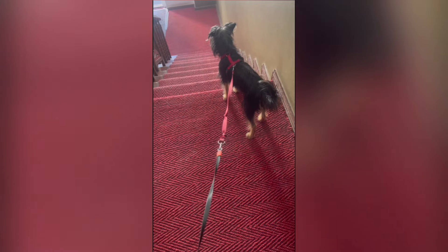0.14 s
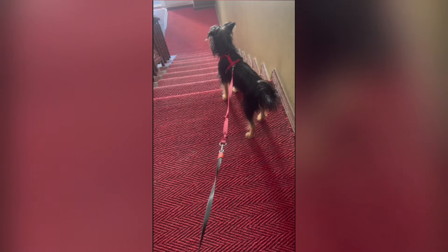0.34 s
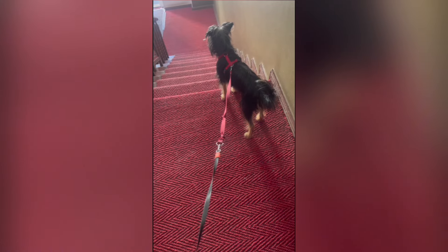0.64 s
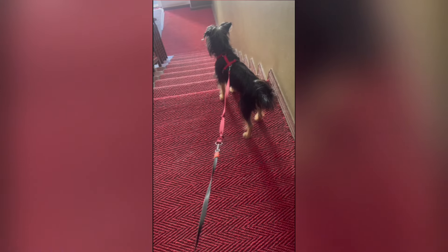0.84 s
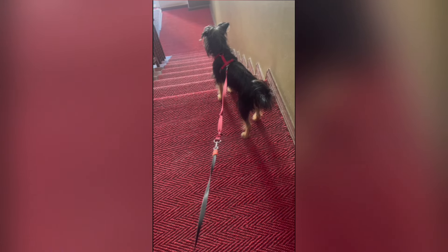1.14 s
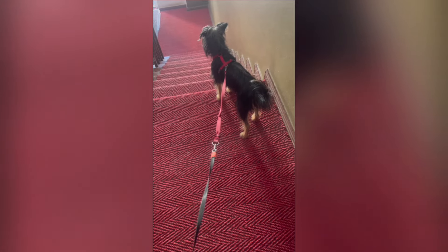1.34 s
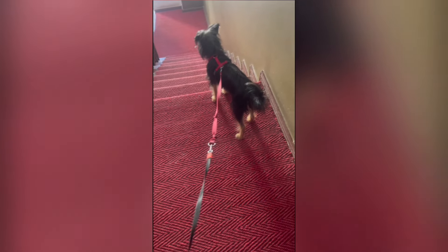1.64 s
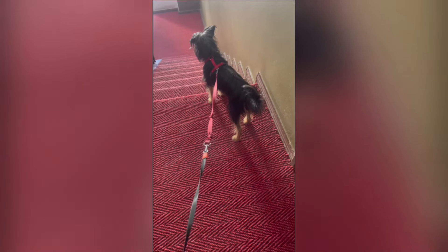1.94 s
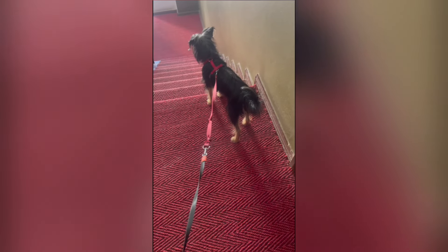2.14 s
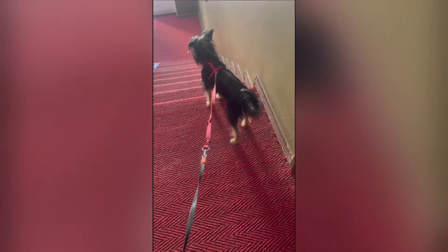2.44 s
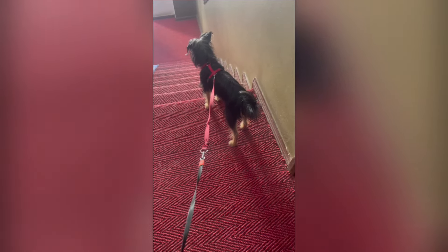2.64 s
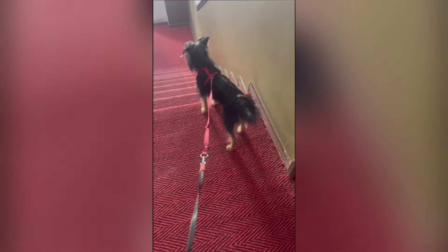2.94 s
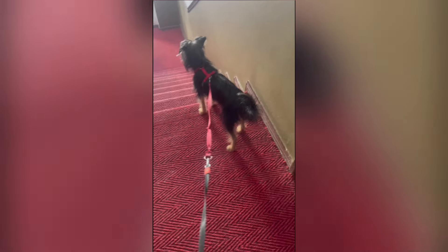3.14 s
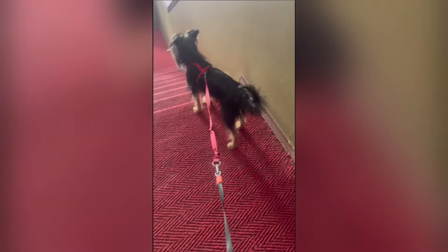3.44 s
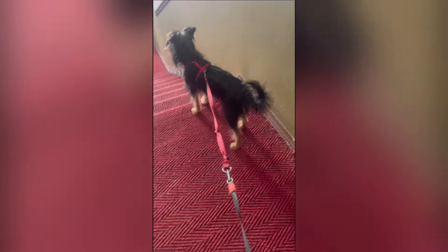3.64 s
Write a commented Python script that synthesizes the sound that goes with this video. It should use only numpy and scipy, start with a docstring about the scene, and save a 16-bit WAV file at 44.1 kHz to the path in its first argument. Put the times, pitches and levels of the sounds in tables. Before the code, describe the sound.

Dog whining indoors: high nose whistles, two yelping whines breaking into grunts, then one longer whine.

```python
"""A small dog whines at the top of a carpeted staircase, a leash's length from the microphone.
Thin whistles through the nose, made of a sine and its octave, alternate with voiced whines built from
overtones; two of the whines break downward into a grunt. Shaped noise makes the hiss in the nose and the
shuffling paws, decaying clicks the clip of the leash, and falling sine thuds its twitches.
The stairwell rings behind it all, over the low steady air of the building."""
import sys
import numpy as np
from scipy import signal
from scipy.fft import rfft, irfft, next_fast_len
from scipy.io import wavfile

SR = 44100
rng = np.random.default_rng(int(sys.argv[2]) if len(sys.argv) > 2 else 0)


def dump(signal):
    """Clip the signal to [-1, 1] and save it as 16-bit WAV at the path in sys.argv[1]."""
    limited = np.clip(np.atleast_2d(signal).T, -1, 1)
    pcm = np.round(limited * 32767).astype(np.int16)
    wavfile.write(sys.argv[1], SR, pcm)


N = 167580  # length in samples
EDGE_S = 0.004  # how fast a call starts and stops

# Still air of the building. Each row: frequency in Hz, level in dB.
HUSH = [(20, -2), (60, 2), (260, -0.5), (380, -15.5), (700, -22), (1130, -21.5), (6000, -29), (12000, -45)]
HUSH_DB, HUSH_SPREAD = -57, 0.91  # level of the middle; share of the sides

# Voiced whines, one list per call. Each row: time in seconds, pitch in Hz, level in dB, overtone boost in dB.
WHINES = [
    [(0, 440.3, -41, 1), (.04, 400.7, -35.5, -10), (.1, 366.7, -55.5, -10)],
    [(.48, 521.4, -56, -7.5), (.575, 446.4, -44, -9), (.74, 377, -54, -10.5)],
    [(.945, 370.6, -53, 6.5), (.975, 355.7, -42, -13), (1.07, 324.6, -50.5, -46)],
    [(1.61, 1370, -68.5, 11.5), (1.802, 1311, -60.5, 6), (1.812, 1291, -23.5, 0), (1.822, 1069, -14, -6.5),
     (1.826, 930, -29.5, 22.5), (1.852, 603, -33, 10.5), (1.868, 460, -54, 10.5)],
    [(2.519, 1206, -42.5, -10.5), (2.531, 1168, -19.5, 9.5), (2.556, 1146, -18, 1.5),
     (2.572, 1090, -14.5, -4), (2.588, 910.7, -35.5, 19), (2.61, 700.4, -29.5, 10.5), (2.628, 411, -23, 3),
     (2.65, 369.5, -18, -20.5), (2.7, 372, -42.5, -20.5)],
    [(3.245, 1295, -55, -25), (3.272, 1274, -31, -0.5), (3.3, 1207, -25, 5.5), (3.382, 1086, -21, 6.5),
     (3.46, 1066, -25, 9.5), (3.545, 993.7, -19, -5.5), (3.667, 875, -24, -4.5), (3.748, 870.2, -22, -11.5),
     (3.8, 886, -14.5, -15.5)],
]
# Overtone strength given by throat and muzzle. Each row: frequency in Hz, level in dB.
THROAT = [(800, -9.5), (1080, -0.5), (1500, -44.5), (1900, -34.5), (2600, -26.5), (3500, -40),
          (4200, -45.5), (4800, -30), (6000, -35.5), (7500, -34.5), (11000, -55.5)]
# Turbulence in the throat as the voice breaks. Each row: frequency in Hz, level in dB.
RASP_COLOUR = [(1100, -1), (1800, -14.5), (2750, 1), (3800, -15), (5400, -12), (14000, -34)]
# The dull air of a low voice. Each row: frequency in Hz, level in dB.
GRUFF_COLOUR = [(430, 5.5), (750, -6), (1080, 2.5), (1450, -34.5), (6000, -54.5)]
FLICKER_DB, FLICKER_HZ = 4, 22  # each overtone swells and fades by itself
VOICE_JITTER, VOICE_JITTER_HZ = 0.1913, 197  # pitch deviation at full roughness, as a share
SHIMMER, SHIMMER_HZ = 1.06, 82  # a rough voice also trembles in level
CLEAR_ROUGH = 0.017  # roughness of a clear voice
FAINT_DB, FAINT_ROUGH = -47.5, .12  # below this level the voice is husky
BREAK_HZ, BREAK_ROUGH = 937, 0.63  # the voice roughens below this pitch, more so with boosted overtones
RASP, GRUFF, SMEAR_DB = 0.19, 0.94, 14  # at full roughness: rasp, dull air, loss of the overtones
CHEST_HZ = 246  # a small body radiates little below this

# Paws and leash shuffling on the carpet. Each row: start in seconds, length in seconds, level in dB.
SHUFFLES = [(.13, 0.15, -52.5), (.852, 0.03, -54), (3.0, .75, -51.5), (3.498, 0.01, -44)]
# Colour of the carpet noise. Each row: frequency in Hz, level in dB.
CARPET = [(30, -2), (80, 11.5), (450, -0.5), (1100, -6.5), (1500, -16.5), (2400, -8.5), (5000, -42.5)]
SHUFFLE_RISE_SHARE, SHUFFLE_FALL_S = 0.21, 0.017  # rise as a share of the length

# Nasal whistles, one list per call. Each row: time in seconds, pitch in Hz, level in dB.
WHISTLES = [
    [(.222, 5380, -70), (.243, 5215, -36), (.28, 5220, -28), (.355, 4690, -53.5)],
    [(1.302, 4946, -54.5), (1.347, 5655, -32.5), (1.468, 6220, -25.5), (1.497, 5910, -23),
     (1.56, 6010, -29.5), (1.635, 6270, -40.5), (1.765, 6336, -41.5)],
    [(2.06, 5960, -73), (2.092, 5940, -43), (2.106, 6290, -34.5), (2.144, 6230, -28.5), (2.18, 6190, -39.5),
     (2.216, 5760, -32.5), (2.325, 5627, -35), (2.38, 5857, -34.5), (2.466, 5810, -32), (2.56, 5730, -50.5)],
    [(2.85, 6120, -79), (2.9, 5967, -37.5), (2.95, 5815, -32), (3.075, 5758, -57)],
    [(3.275, 5930, -45.5), (3.31, 5910, -29), (3.39, 5786, -51)],
]
OCTAVE_DB = -21.5  # second harmonic against the fundamental
WHISTLE_JITTER, WHISTLE_JITTER_HZ = 0.0036, 66.6  # pitch deviation as a share
FLUTTER, FLUTTER_HZ = 0.4, 118  # level deviation as a share

# Air through the nose. Each row: start in seconds, length in seconds, level in dB.
PUFFS = [(.24, 0.097, -52), (.945, 0.02, -57), (1.35, 0.52, -47.5), (2.09, 0.6, -52.5), (2.88, 0.37, -55.5),
         (3.26, 0.13, -48.5), (3.4, 0.46, -57)]
# Colour of the nasal hiss. Each row: frequency in Hz, level in dB.
NOSE = [(300, -27.5), (3800, -10.5), (5400, 9.5), (7500, 8), (10200, -10.5), (12000, -13), (13200, -5),
        (15200, -6.5)]
PUFF_RISE_SHARE, PUFF_FALL_S = 0.3, 0.012  # the air builds up over a share of each puff
GUST_DB, GUST_HZ = 2, 30  # depth of each of two drifts in the airflow

# Ticks of the leash clip, before the mix. Each row: start in seconds, level in dB.
TICKS = [(1.225, -33), (1.452, -33.5), (3.2, -35.5)]
CLIP = [(900, -13.5), (1800, 11), (6000, -3.5), (12000, -34.5)]
TICK_DECAY_S = 0.006

# Twitches of the leash, doubled in the mix. Each row: start in seconds, level in dB.
TWITCHES = [(3.414, -42), (3.481, -38.5), (3.564, -47.5), (3.661, -36), (3.711, -45), (3.759, -42)]
TWITCH_SWEEP_HZ, TWITCH_END_HZ = 1434, 159  # the pitch starts at their sum and falls to the second
TWITCH_GLIDE_S, TWITCH_PEAK_S = 0.00239, 0.0053

# Early reflections off wall and floor. Each row: delay in seconds, gain as a plain factor.
ECHOES = [(.0078, -0.16), (.027, 0.21)]
# Ring of the stairwell. Each row: frequency in Hz, time to fall by 60 dB in seconds.
STAIRWELL = [(100, 1), (370, 0.57), (600, 0.44), (1100, 0.37), (2500, 0.34), (6000, 0.24), (15000, 0.049)]
# Drive of the reverberation. Each row: frequency in Hz, level in dB.
TAIL = [(400, -1), (1100, -5.5), (6000, -3)]
TAIL_START_S, TAIL_BUILD_S, TAIL_SPREAD = 0.0042, 0.014, 0.69

# Phase between the microphone ports. Each row: frequency in Hz, lead of the left in radians.
PORT_PHASE = [(1100, 0), (5170, .35), (5700, 1.2), (6300, 1.5), (8400, 2.9), (15000, 3.2)]
# Balance between the ports. Each row: frequency in Hz, left over right in dB.
PORT_BALANCE = [(60, -1.5), (380, 3), (1200, 0.5)]
CUT_HZ = 15800  # upper band limit


def amp(db):
    """Decibels to gain."""
    return 10 ** (np.asarray(db) / 20)


def unit(x):
    """Scales to rms 1."""
    return x / np.sqrt(np.mean(x ** 2) + 1e-20)


def read(points, hz):
    """Reads a spectrum table on a log-frequency axis."""
    f, value = np.transpose(points)
    return np.interp(np.log(hz + 1), np.log(f + 1), value)


def add(mix, s, sound):
    """Mixes a sound in at time s."""
    part = mix[max(round(s * SR), 0):][:len(sound)]
    part += sound[:len(part)]


def colour(x, points):
    """Filters by a table of frequencies and decibels."""
    hz = np.fft.rfftfreq(len(x), 1 / SR)
    return irfft(rfft(x) * amp(read(points, hz)), len(x))


def noise(points):
    """Coloured noise of rms 1."""
    return unit(colour(rng.standard_normal(N), points))


def wander(rate_hz):
    """Random drift, mostly slower than the given rate, rms 1."""
    hz = np.fft.rfftfreq(N, 1 / SR)
    return unit(irfft(rfft(rng.standard_normal(N)) / (1 + (hz / rate_hz) ** 2), N))


def controls(call):
    """Where a call sounds, its fading gate, and its columns sample by sample."""
    s, *columns = np.transpose(call)
    t = np.arange(N) / SR
    gate = np.clip(np.minimum(t - s[0], s[-1] - t) / EDGE_S + 1, 0, 1)
    on = gate > 0
    return on, gate[on], [np.interp(t[on], s, c) for c in columns]


def bursts(rows, spectrum, rise_share, fall_s):
    """Noise that swells, holds and dies away once per row."""
    t = np.arange(N) / SR
    level = np.zeros(N)
    for s, length, db in rows:
        rise = np.clip((t - s) / (rise_share * length), 0, 1)
        fall = np.exp(-np.maximum(t - s - length, 0) / fall_s)
        level += amp(db) * rise * fall
    return level * noise(spectrum)


def hush():
    """Low steady background of the building: wide, coloured noise."""
    mid, side = noise(HUSH), HUSH_SPREAD * noise(HUSH)
    return amp(HUSH_DB) * np.array([mid + side, mid - side])


def whines():
    """Vocal folds: strong fundamental and flickering overtones, yielding to rasp and gruff air as they break."""
    out, jitter = np.zeros(N), wander(VOICE_JITTER_HZ)
    air, gruff = noise(RASP_COLOUR), noise(GRUFF_COLOUR)
    shimmer = SHIMMER * wander(SHIMMER_HZ)
    flicker = {k: FLICKER_DB * wander(FLICKER_HZ) for k in range(2, 16)}
    for call in WHINES:
        on, gate, (hz, db, boost_db) = controls(call)
        broken = BREAK_ROUGH * np.maximum(1 - hz / BREAK_HZ, 0) * amp(boost_db / 2)
        rough = CLEAR_ROUGH + FAINT_ROUGH * (db < FAINT_DB) + broken
        phase = 2 * np.pi * np.cumsum(hz * (1 + VOICE_JITTER * rough * jitter[on])) / SR
        overtones = np.zeros(len(hz))
        for k, drift_db in flicker.items():
            overtones += amp(read(THROAT, k * hz) + drift_db[on]) * np.cos(k * phase)
        tone = np.cos(phase) + amp(boost_db - SMEAR_DB * rough) * overtones
        voice = (1 + rough * shimmer[on]) * tone
        # The rough air pulses with each cycle of the voice
        breath = rough * (RASP * amp(boost_db) * air[on] + GRUFF * gruff[on])
        rasp = breath * (1 + .5 * np.cos(phase))
        out[on] += np.sqrt(2) * gate * amp(db) * (voice + rasp)
    return signal.sosfilt(signal.butter(4, CHEST_HZ, "high", fs=SR, output="sos"), out)


def shuffles():
    """Friction on the carpet: dull noise in swells."""
    return bursts(SHUFFLES, CARPET, SHUFFLE_RISE_SHARE, SHUFFLE_FALL_S)


def whistles():
    """Air whistling in the nose: a nearly pure, slightly unsteady tone with a faint octave."""
    out, jitter, flutter = np.zeros(N), wander(WHISTLE_JITTER_HZ), wander(FLUTTER_HZ)
    for call in WHISTLES:
        on, gate, (hz, db) = controls(call)
        phase = 2 * np.pi * np.cumsum(hz * (1 + WHISTLE_JITTER * jitter[on])) / SR
        tone = np.sin(phase) + amp(OCTAVE_DB) * np.sin(2 * phase)
        out[on] += np.sqrt(2) * gate * amp(db) * (1 + FLUTTER * flutter[on]) * tone
    return out


def nose_air():
    """Turbulent air in the nose: bright puffs of noise whose flow is uneven."""
    gusts = amp(GUST_DB * (wander(GUST_HZ) + wander(GUST_HZ)))
    return bursts(PUFFS, NOSE, PUFF_RISE_SHARE, PUFF_FALL_S) * gusts


def ticks():
    """Short dry clicks of the leash clip: noise under a quick decay."""
    out, t, click = np.zeros(N), np.arange(SR // 10) / SR, noise(CLIP)
    for k, (s, db) in enumerate(TICKS):
        grain = click[k * len(t):][:len(t)]
        add(out, s, amp(db) * np.exp(-t / TICK_DECAY_S) * grain)
    return out


def twitches():
    """A snap runs along the taut leash, treble first, and arrives as a short falling thud."""
    out, t = np.zeros(N), np.arange(SR // 20) / SR
    hz = TWITCH_END_HZ + TWITCH_SWEEP_HZ * np.exp(-t / TWITCH_GLIDE_S)
    age = (t / TWITCH_PEAK_S) ** 2
    thud = age * np.exp(1 - age) * np.sin(2 * np.pi * np.cumsum(hz) / SR)
    for s, db in TWITCHES:
        add(out, s, amp(db) * thud)
    return out


def stairwell(x):
    """Direct sound, a few reflections and a diffuse decaying tail that differs between the ports."""
    size = SR
    hz, t, z = signal.stft(rng.choice([-1., 1.], (2, size)), SR, nperseg=256)
    t60 = np.maximum(read(STAIRWELL, hz), .05)[:, None]
    decay = np.exp(-np.log(1000) * t / t60)
    even_energy = np.sqrt(np.log(10 ** 6) / t60 / SR)  # long and short decays carry equal energy
    z = z * amp(read(TAIL, hz)[:, None]) * decay * even_energy
    build = np.clip((np.arange(size) / SR - TAIL_START_S) / TAIL_BUILD_S, 0, 1)
    mid, side = signal.istft(z, SR, nperseg=256)[1][:, :size] * build
    mid[0] += 1  # direct sound
    for delay, gain in ECHOES:
        add(mid, delay, np.array([gain]))
    response = np.array([mid + TAIL_SPREAD * side, mid - TAIL_SPREAD * side])
    return signal.fftconvolve(x[None], response, axes=1)[:, :N]


def scene():
    """The dog in the stairwell, with the leash close to the microphone."""
    dog = whines() + whistles() + nose_air()
    clip = ticks()
    room = stairwell(dog + shuffles() + 0.12 * clip)
    return room + 0.16 * clip + 2 * twitches() + hush()


def record(dry):
    """Two microphone ports whose phase parts in the treble, a brief closing fade and the band limit."""
    size = next_fast_len(N + 4096)
    hz = np.fft.rfftfreq(size, 1 / SR)
    # Each port takes half of the difference
    port = amp(read(PORT_BALANCE, hz) / 2) * np.exp(.5j * read(PORT_PHASE, hz))
    fade = np.minimum(np.arange(N)[::-1] / (EDGE_S * SR), 1)
    pair = irfft(rfft(dry * fade, size) * np.array([port, 1 / port]), size)[:, :N]
    band_limit = signal.firwin(511, CUT_HZ, window=("kaiser", 9), fs=SR)
    return signal.oaconvolve(pair, band_limit[None], "same")


dry = scene()
out = record(dry)
dump(out)
```